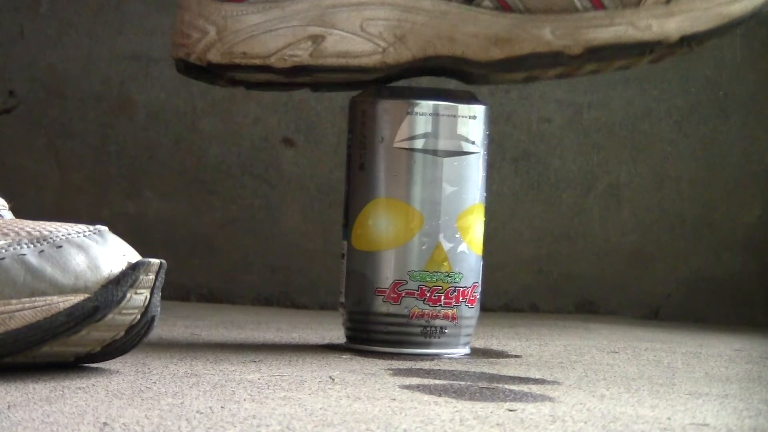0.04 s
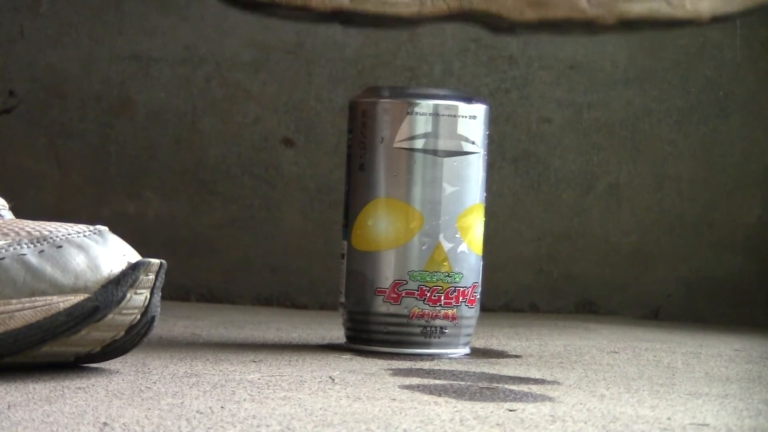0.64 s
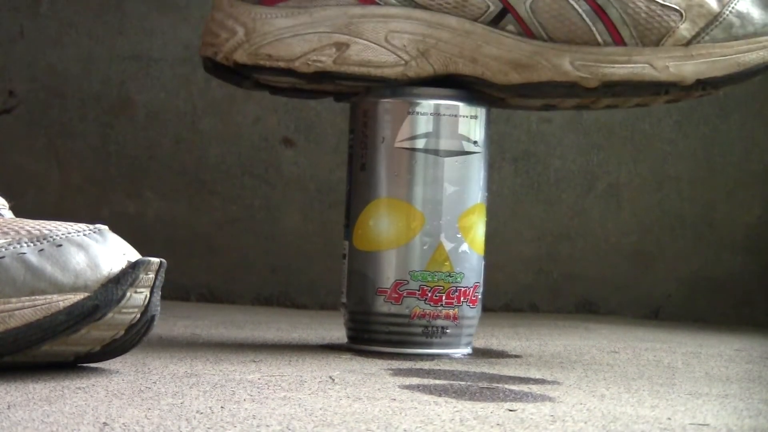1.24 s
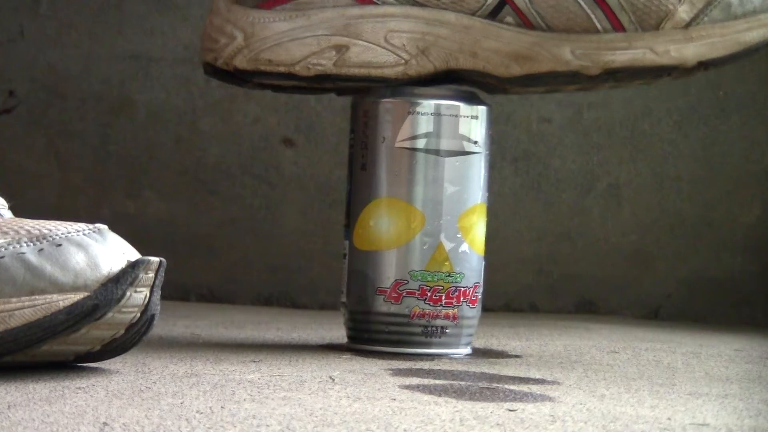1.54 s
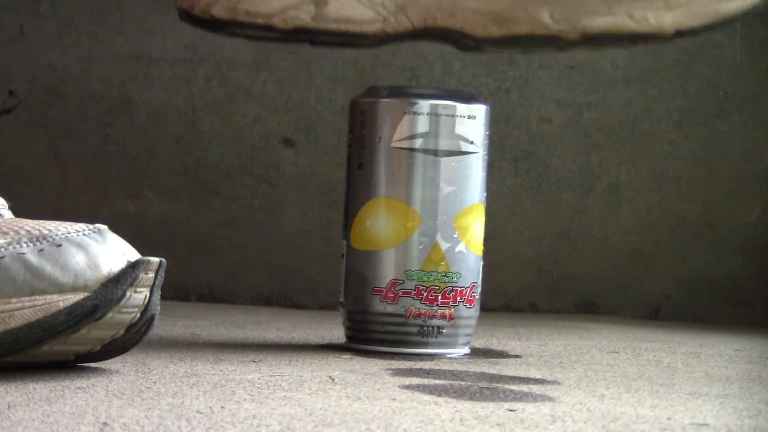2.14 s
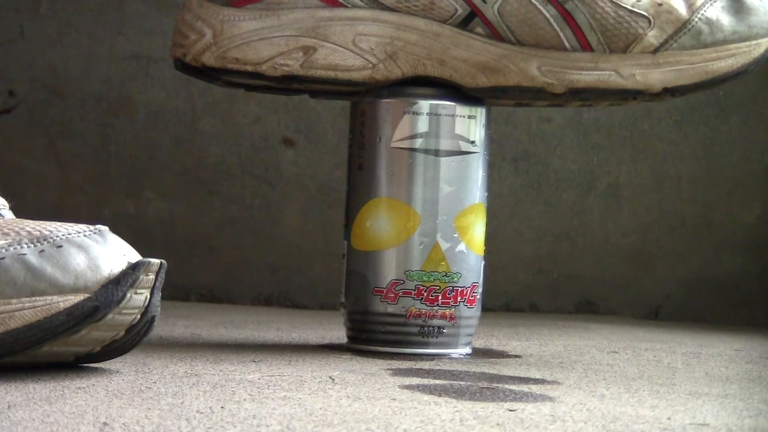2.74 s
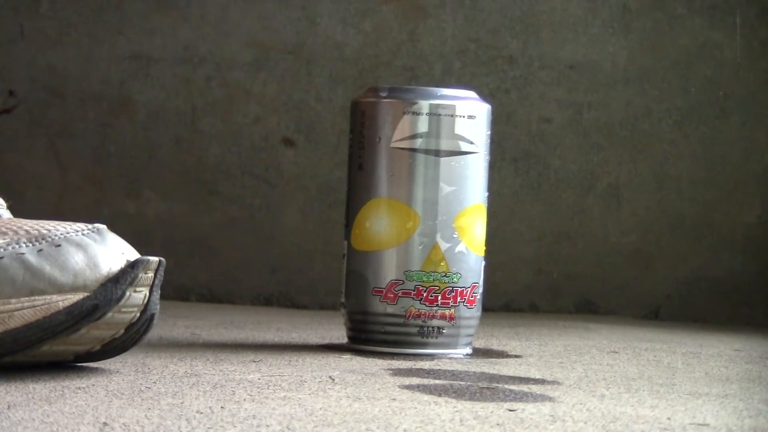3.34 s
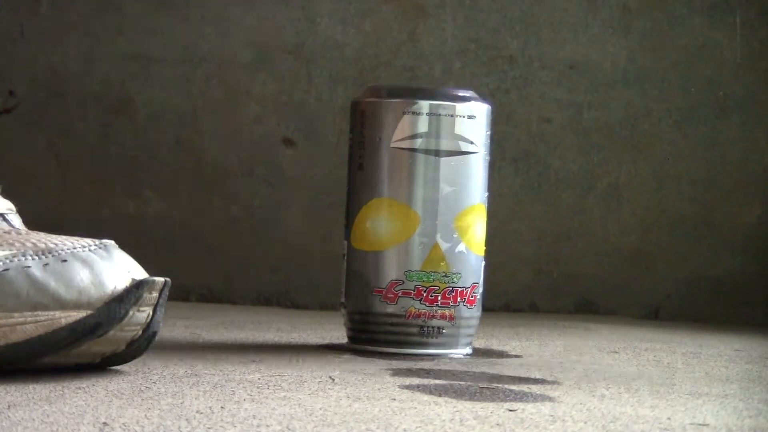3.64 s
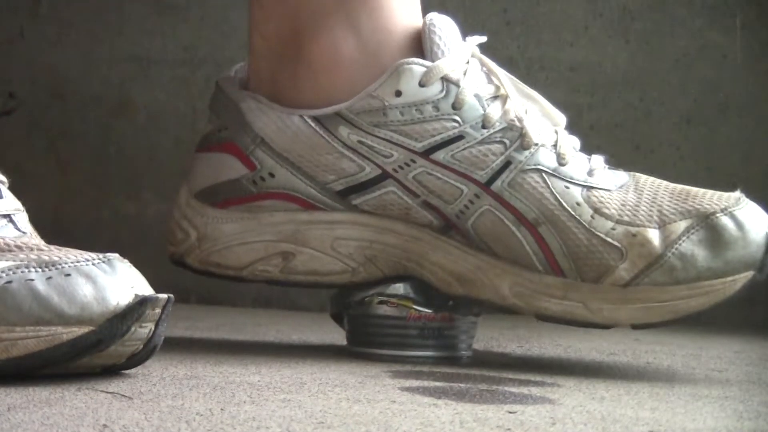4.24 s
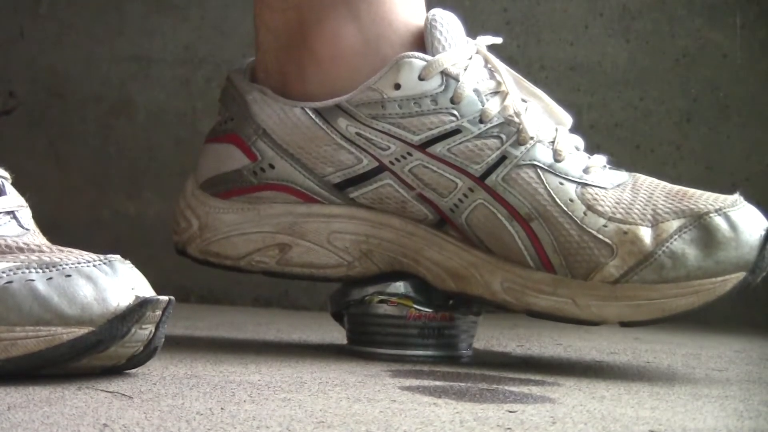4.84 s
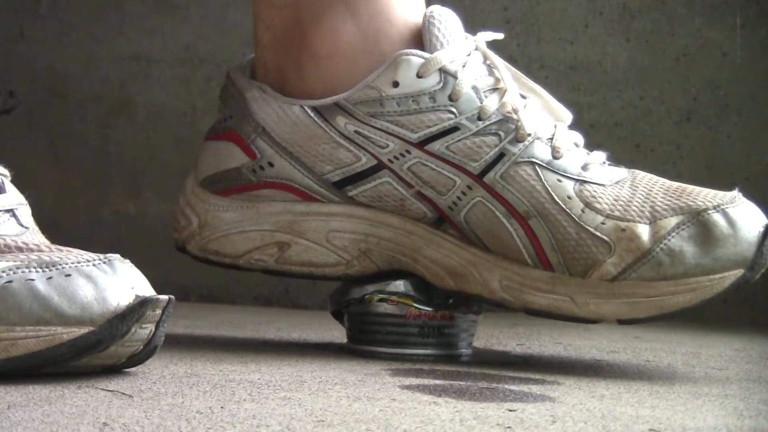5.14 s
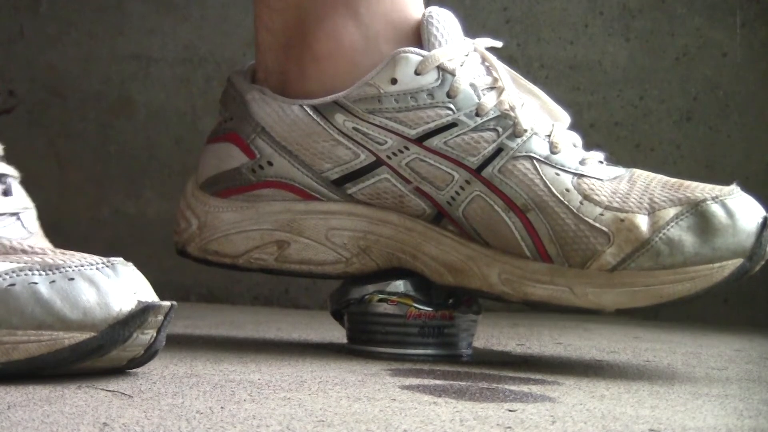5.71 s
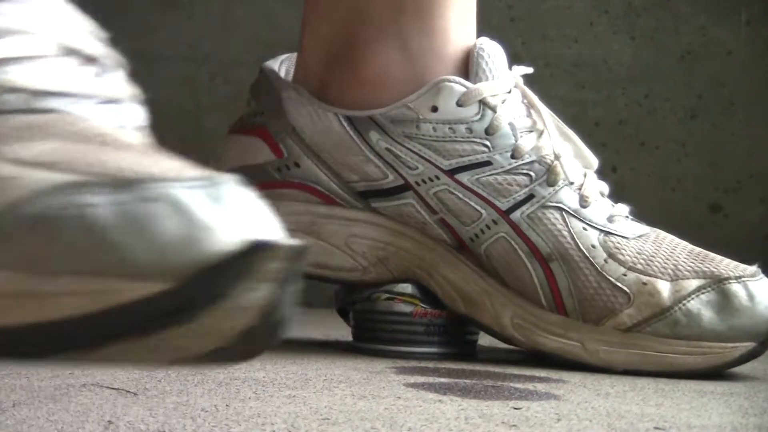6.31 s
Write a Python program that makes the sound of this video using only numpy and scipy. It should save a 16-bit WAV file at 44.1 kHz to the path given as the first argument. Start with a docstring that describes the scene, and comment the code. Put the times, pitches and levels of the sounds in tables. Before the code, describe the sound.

A shoe lightly taps an empty aluminium can on a concrete floor, making it rattle on its rim, ring briefly and give a faint hollow hoot. After a short pause, the foot stamps it flat with one very loud, sharp crunch that overloads the close microphone. Soft thuds, scuffs and cracking sand follow as the shoes settle. Bare walls add a short echo, over a low hum and faint motor ticking.

```python
"""An empty aluminium can is stamped flat on a concrete floor: its wall snaps into folds and its lid
slams onto its base. Before that, a shoe taps and rocks it, so the metal rings and the air inside hoots.
Afterwards the shoes settle and step, with soft thuds, scuffs and cracking sand. Bare walls ring briefly,
and the stamp overloads the microphone. A camera's lens motor ticks faintly over a low hum."""
import sys
import numpy as np
from scipy import signal
from scipy.fft import rfft, irfft
from scipy.io import wavfile
from scipy.ndimage import uniform_filter1d

SR = 44100
rng = np.random.default_rng(int(sys.argv[2]) if len(sys.argv) > 2 else 0)


def store_wav(level_fs):
    """Save 16-bit WAV to argv[1]."""
    pcm = np.round(np.clip(np.atleast_2d(level_fs), -1, 1) * 32767)
    wavfile.write(sys.argv[1], SR, pcm.T.astype(np.int16))


N = 289737
T = np.arange(int(.45 * SR)) / SR  # the time axis of one short sound, in seconds
STAMP_S, SLAM_S = 3.7154, 3.7197  # the wall starts to fold, then the lid hits the base

# The collapsing can, damped by the sole. Each row: pitch in Hz, relative level in dB, seconds to fade 60 dB.
CRUSHED_TONES = [(280, -8, 0.064), (329.6, -13, 0.18), (556, 1, 0.057), (656, -6.5, 0.058),
                 (813, -9.5, 0.048), (780, -5, 0.035), (976.7, -4.5, 0.069), (1117, -14, 0.066),
                 (1472, -6, 0.019), (1860, -4, 0.0088), (2100, -5.5, 0.03), (2270, -4.5, 0.03),
                 (3090, -6.5, 0.029), (4700, -11.5, .008)]
# The crack of one fold. Each row: frequency in Hz, relative level in dB.
CRACK_SPECTRUM = [(30, -22), (90, -7), (260, -0.5), (400, -5.5), (700, 4), (2200, -0.5), (2700, -5),
                  (3300, -4), (4000, -10.5), (5000, -8.5), (6200, -17), (10000, -17.5), (12000, -29.5),
                  (16000, -54.5)]
# The stamp's weight lands on the floor. Each row: start in seconds, pitch in Hz, level in dB.
FLOOR_THUMPS = [(3.714, 100.7, -14), (3.7190, 225.1, -8)]
# The sole meets the lid. Each row: start in seconds, ring level in dB, rattle time in seconds,
# knock pitch in Hz, knock level in dB, level of the sole's thud in dB.
LID_TAPS = [(0.871, -43.5, 0.0067, 545, -38.5, -45), (0.892, -45, .014, 159.8, -40, -52),
            (0.990, -59.5, .004, 1340, -59, -59), (1.01, -46, .007, 1680, -53, -70),
            (1.019, -32.5, 0.0057, 900, -31, -39.5), (2.3316, -27, .006, 1580, -35.5, -41),
            (2.923, -49, 0.0054, 350, -51.5, -49), (2.981, -61, .003, 1200, -57.5, -54.5),
            (3.034, -47, .006, 740, -51.5, -55)]
# The can rocks as the sole leaves it. Each row: start in seconds, seconds between touches, ring level
# in dB, change per touch in dB, knock pitch in Hz, knock level in dB compared with the ring.
ROCKING_RUNS = [(0.001, 0.013, -36, -1.34, 970, -8), (1.658, 0.0099, -44, -0.3, 587, -4),
                (1.769, .0215, -55.5, -1.95, 650, 0.5)]
# The ring of the uncrushed can. Each row: pitch in Hz, relative level in dB, seconds to fade 60 dB.
CAN_TONES = [(460, -32.5, 0.64), (563, -12, 0.18), (880, -6, 0.053), (946, -4, 0.026), (1123, -5, 0.04),
             (1330, -9.5, 0.17), (1403, -6.5, 0.069), (1660, -4, 0.14), (1707, -2.5, 0.11),
             (1788, 0.5, 0.095), (2050, -2, 0.12), (2110, -5.5, 0.058), (2510, -8, 0.058),
             (2947, -0.5, 0.056), (3137, 2, 0.022), (3346, 9.5, 0.029), (3430, 0, 0.0067),
             (5240, -17, 0.042), (7800, -34, 0.022), (8100, -13, 0.0075), (8400, -34, 0.071),
             (9600, -27, 0.0076)]
# The tick of the rim on concrete. Each row: frequency in Hz, relative level in dB.
RIM_SPECTRUM = [(80, -6), (300, -1.5), (1000, 5.5), (2200, 7), (2700, -10), (3350, -4), (4100, -12.5),
                (6500, -24.5), (9500, -17), (11500, -35), (13500, -29)]
# The air in the can hoots. Each row: start in seconds, level in dB, seconds to fade 60 dB,
# pitch in Hz while the opening is half covered.
AIR_HOOTS = [(0.051, -53.5, 0.76, 441), (1.88, -54.5, 0.28, 338)]
# Shoes settle and step. Each row: start in seconds, thud level in dB, thud pitch in Hz, thud time
# in seconds, scuff level in dB, scuff time in seconds, delay of the scuff in seconds.
FOOTSTEPS = [(3.16, -52, 174, 0.14, -65, .2, 0.00043), (4.136, -50, 280, .006, -56.5, 0.029, .008),
             (4.273, -54, 258, 0.014, -64, 0.034, .003), (4.697, -41.5, 288, .013, -50.5, .028, .004),
             (5.846, -50.5, 190, .022, -46.5, 0.036, .001), (5.939, -56.5, 378, 0.0053, -57.5, .01, 0),
             (6.401, -52, 230, 0.0087, -63, 0.018, 0.0024), (6.506, -48.5, 183, 0.013, -43, 0.022, 0)]
# Rubber scuffing the floor. Each row: frequency in Hz, relative level in dB.
SCUFF_SPECTRUM = [(100, -9), (500, 2.5), (1100, 1), (2200, -6), (3500, -14.5), (6000, -34.5), (10000, -34),
                  (13000, -48)]
# Sand cracks under the soles. Each row: start in seconds, level in dB, crackle time in seconds.
SAND_CRACKS = [(3.575, -62.5, 0.029), (5.476, -71, .0012), (5.8382, -46, .004), (5.898, -60.5, 0.039),
               (5.983, -72.5, .002)]
# One cracking grain. Each row: frequency in Hz, relative level in dB.
SAND_SPECTRUM = [(300, -12.5), (1200, 3), (2400, 2.5), (4500, -6), (7000, -13), (10500, -11), (12500, -30),
                 (16000, -46)]
# The rustle of the swinging leg. Each row: frequency in Hz, relative level in dB.
SWISH_SPECTRUM = [(200, -9.5), (1000, 4), (3500, 1.5), (6000, -8.0), (10000, -11), (13000, -29.5)]
# The tones of the lens motor. Each row: pitch in Hz, peak level in dB.
MOTOR_TONES = [(1790, -61), (2210, -73), (2750, -77)]
# Steady air noise. Each row: frequency in Hz, relative level in dB.
AIR_SPECTRUM = [(20, -8), (42, 0.5), (62, -5.5), (110, -3), (200, -1.5), (410, -7.5), (780, -10.5),
                (1400, -16.5), (1800, -13.5), (2500, -22.5), (3400, -25.5), (14700, -44), (16000, -48)]
# The air noise's stereo width. Each row: frequency in Hz, side level in dB compared with the middle.
AIR_WIDTH = [(30, -4.5), (150, 4), (1500, 0.0), (8000, -4)]
# A machine's hum. Each row: pitch in Hz, level in dB.
HUM_TONES = [(49, -74), (101, -76.5), (204, -79), (301, -92), (560, -83), (807, -86.5)]
# Echoes from nearby walls. Each row: delay in seconds, level in dB compared with the direct sound.
WALL_ECHOES = [(.0028, -21), (0.0133, -16), (0.0211, -14.5), (0.0316, -19)]
# The room's lingering sound. Each row: frequency in Hz, relative level in dB, seconds to fade 60 dB.
ROOM_BANDS = [(59.77, -7.5, 0.57), (130.4, -7, 0.41), (280, -6.5, 0.29), (600, -0.5, 0.29), (1150, 1, .33),
              (1990, -2, 0.32), (3400, -6, 0.31), (9000, -5.5, 0.28), (15000, -7.5, .18)]
# How unlike the two microphone openings sound. Each row: frequency in Hz, side level in dB
# compared with the middle.
STEREO_WIDTH = [(30, -7.5), (80, -10), (250, -17), (2000, -18), (4000, -16.5), (8000, -12), (13000, -6.5)]


def stamp(folds=9, first_gap_s=.0017, gap_growth=1.33, fall_db_per_s=220):
    """The can's wall buckles ever more slowly as the foot is braked; the lid slams and the floor thumps."""
    out, start, gap = np.zeros(N), STAMP_S, first_gap_s
    for _ in range(folds):
        age = start - STAMP_S
        weight = 1 - .35 * np.exp(-age / .0018)  # the foot's weight builds up
        # the folds are brightest while the metal is packed hardest
        bright_hz = 1900 + 13000 * np.exp(-((start - 3.7225) / .003) ** 2)
        snap = fold(-1 - fall_db_per_s * age, bright_hz, crinkle_s=.0014 + .39 * gap)
        add(out, start, weight * snap)
        start += gap
        gap *= gap_growth
    add(out, SLAM_S, fold(db=6, bright_hz=8963, crinkle_s=.00091))
    for start, hz, db in FLOOR_THUMPS:
        add(out, start, level(knock(hz, cycles=.97), db))
    # the stamp's deepest bass, below 80 Hz, is cut away
    return signal.lfilter(*signal.butter(2, 80, "high", fs=SR), out)


def fold(db, bright_hz, crinkle_s):
    """One snap of the wall crinkles the metal around it and rings the collapsing can."""
    shell = level(ring(CRUSHED_TONES, scatter_db=-1.0, detune=.019), -1.5)
    creases = chatter(crinkle_s, per_second=8870, swarm_db=4)
    crinkle = level(through(creases, click(CRACK_SPECTRUM)), 0)
    soften = signal.butter(1, min(bright_hz, SR / 2.2), fs=SR)
    return level(signal.lfilter(*soften, shell + crinkle), db)


def taps():
    """The sole taps the lid, and the can rocks on its rim in three short runs."""
    out, thud = np.zeros(N), knock(hz=296, cycles=.49)
    for start, ring_db, rattle_s, knock_hz, knock_db, thud_db in LID_TAPS:
        add(out, start - .0017, level(thud, thud_db))  # the rubber thuds just before the metal answers
        add(out, start, can_touch(ring_db, rattle_s, knock_hz, knock_db))
    for run in ROCKING_RUNS:
        add_rocking(out, *run)
    # the taps' highest treble is cut away above about 11 kHz
    return signal.sosfilt(signal.butter(8, 11300, fs=SR, output="sos"), out)


def can_touch(ring_db, rattle_s, knock_hz, knock_db):
    """One touch on the can: the lid knocks, the rim rattles on the floor and the wall rings."""
    wall = level(ring(CAN_TONES, scatter_db=.4, detune=.0077), 0)
    rim = level(click(RIM_SPECTRUM), 6.5 + .16 * ring_db)  # harder blows drive the rim into the floor
    bounces = chatter(rattle_s, per_second=3500, swarm_db=8.5)
    rattle = level(through(bounces, wall + rim), ring_db)
    lid = level(knock(knock_hz, cycles=.49 + knock_hz / 3500), knock_db)
    return rattle + lid


def add_rocking(out, start, gap_s, first_db, change_db, knock_hz, knock_offset_db):
    """The can rocks on its rim: five evenly spaced, fading touches, each with a dull rub."""
    rattle_s, spread_octaves = .014, .13
    for k, chance in enumerate(rng.standard_normal(5)):
        ring_db = first_db + k * change_db
        hz = knock_hz * 2 ** (spread_octaves * chance)
        rub = through(chatter(rattle_s, per_second=1800, swarm_db=6.5), knock(hz=231, cycles=.4))
        touch = can_touch(ring_db, rattle_s, hz, ring_db + knock_offset_db)
        add(out, start + k * gap_s, touch + level(rub, ring_db - 11))


def hoots(open_hz=454, uncover_s=.045):
    """The hollow note of the air in the can rises as the sole uncovers the opening."""
    out = np.zeros(N)
    for start, db, fade_s, covered_hz in AIR_HOOTS:
        hz = open_hz + (covered_hz - open_hz) * np.exp(-T / uncover_s)
        # air squeezing past the rubber makes the note waver until the hole is clear
        waver = uniform_filter1d(rng.standard_normal(len(T)), size=256)
        hz = hz + .8 * (open_hz - hz) * waver / np.std(waver)
        swell = (1 - np.exp(-T / .014)) * fade(fade_s)
        note = np.sin(2 * np.pi * np.cumsum(hz) / SR)
        add(out, start, level(swell * note, db))
    return out


def steps():
    """Soft soles thud and scuff; sand grains crack beneath them."""
    out, scuff, sand = np.zeros(N), click(SCUFF_SPECTRUM), click(SAND_SPECTRUM)
    for start, thud_db, thud_hz, thud_s, scuff_db, scuff_s, delay_s in FOOTSTEPS:
        landing = chatter(thud_s, per_second=3000, swarm_db=6.5)
        add(out, start, level(through(landing, knock(thud_hz, cycles=.43)), thud_db))
        rubbing = chatter(scuff_s, per_second=1600, swarm_db=18)
        add(out, start + delay_s, level(through(rubbing, scuff), scuff_db))
    for start, db, crackle_s in SAND_CRACKS:
        grains = chatter(crackle_s, per_second=2400, swarm_db=6.5)
        add(out, start, level(through(grains, sand), db))
    return out


def leg_swish(loudest_s=3.58, width_s=.17, db=-75):
    """The leg and shoe rustle softly on their way down, stopping at the stamp."""
    t = np.arange(N) / SR
    rustle = through(rng.standard_normal(N), click(SWISH_SPECTRUM))
    swell = np.exp(-.5 * ((t - loudest_s) / width_s) ** 2) * (t < STAMP_S)
    return rustle / np.std(rustle) * gain(db) * swell


def lens_motor(beats_per_s=59.94, offset_s=-.0163, peak_s=.006):
    """The focus motor nudges the lens, ticking on four of every nine beats of a fast, steady pulse."""
    out, t = np.zeros(N), T[:SR // 40]
    pulse = np.exp(-.5 * ((t - peak_s) / .0019) ** 2)
    tail = .053 * (t > peak_s) * np.exp(-(t - peak_s) / .0087)
    for beat in range(1, int(N / SR * beats_per_s)):
        if beat % 9 in (0, 2, 4, 6):
            strength, phase = rng.standard_normal(2)
            tones = sum(gain(db + 1.2 * strength) * np.sin(2 * np.pi * hz * t + np.pi * phase)
                        for hz, db in MOTOR_TONES)
            add(out, offset_s + beat / beats_per_s - peak_s, (pulse + tail) * tones)
    return out


def air_noise(middle_db=-69.5):
    """A soft, low rush of air, spread between left and right."""
    hz = np.fft.rfftfreq(N, 1 / SR)
    middle, side = rfft(rng.standard_normal((2, N))) * gain(lookup(hz, AIR_SPECTRUM))
    middle = irfft(middle, N)
    side = irfft(side * gain(lookup(hz, AIR_WIDTH)), N)
    return np.array([middle + side, middle - side]) * gain(middle_db) / np.std(middle)


def machine_hum():
    """A machine hums in a few low tones, each wavering slightly."""
    out, t = np.zeros(N), np.arange(N) / SR
    for hz, db in HUM_TONES:
        drift = np.cumsum(rng.standard_normal(N)) / np.sqrt(SR)
        out += np.sqrt(2) * gain(db) * np.sin(2 * np.pi * hz * t + .15 * np.sqrt(hz) * drift)
    return out


def room(source, tail_db, walls):
    """Add echoes and stereo width. Each wall gets its own version of the source to send back."""
    echoes = np.zeros(len(T))
    echoes[0] = 1  # the direct sound
    for delay_s, db in WALL_ECHOES:
        echoes[int(delay_s * SR)] += gain(db)
    tail = sum(through(source(), room_tail()) for _ in range(walls)) / np.sqrt(walls)
    middle = through(source(), echoes) + gain(tail_db) * tail
    smear = rng.standard_normal(len(T)) * fade(.08)
    side = through(middle, through(smear / np.linalg.norm(smear), click(STEREO_WIDTH)))
    return np.array([(middle + side) * gain(.17), (middle - side) * gain(-.17)])


def room_tail(build_s=.0074):
    """Countless echoes blur into noise that builds up, then dies at its own pace in each band."""
    hz, noise = np.fft.rfftfreq(len(T), 1 / SR), rfft(rng.standard_normal(len(T)))
    tail = 0
    for band_hz, db, fade_s in ROOM_BANDS:
        share = lookup(hz, [(row[0], row[0] == band_hz) for row in ROOM_BANDS])
        tail = tail + gain(db) * fade(fade_s) * irfft(noise * share, len(T))
    return tail * (1 - np.exp(-(T / build_s) ** 2)) / np.sqrt(SR * .03)


def ring(tones, scatter_db, detune):
    """Struck metal rings in fading tones; each blow lands elsewhere and mixes them a little differently."""
    out = np.zeros(len(T))
    for k, (hz, db, fade_s) in enumerate(tones):
        louder, higher = rng.standard_normal(2)
        tone = (-1) ** k * np.sin(2 * np.pi * hz * (1 + detune * higher) * T)
        out += gain(db + scatter_db * louder) * fade(fade_s) * tone
    return out


def chatter(length_s, per_second, swarm_db):
    """A first hit, then a dying swarm of random ones; swarm_db sets their combined strength."""
    hits = rng.standard_normal(len(T)) * (rng.random(len(T)) < per_second / SR)
    force = hits * np.exp(-T / length_s) * gain(swarm_db) / np.sqrt(per_second * length_s / 2)
    force[0] = 1
    return force


def knock(hz, cycles):
    """A blow damped by rubber: a wave that swells for this many cycles, then dies."""
    age = T * hz / cycles
    return age * np.exp(-age) * np.sin(2 * np.pi * hz * T)


def click(spectrum, size=4096):
    """The shortest click with this balance of low and high frequencies."""
    hz = np.fft.rfftfreq(size, 1 / SR)
    shape = irfft(np.log(gain(lookup(hz, spectrum))))
    # moving the second half onto the first packs the energy at the start (minimum phase)
    shape[1:size // 2] *= 2
    shape[size // 2 + 1:] = 0
    pulse = irfft(np.exp(rfft(shape)))
    return np.pad(pulse, (0, len(T) - size))


def gain(db):
    """Turn decibels into a number to multiply by."""
    return 10 ** (np.asarray(db) / 20)


def level(sound, db):
    """Give a short sound the energy of 10 milliseconds of steady sound at this level."""
    return sound * gain(db) / np.sqrt(np.sum(sound ** 2) / (SR / 100))


def fade(seconds):
    """A curve that falls by 60 dB in this time."""
    return np.exp(-np.log(1000) * T / seconds)


def add(out, start_s, sound):
    """Mix a sound into out at this time."""
    i = max(int(start_s * SR), 0)
    out[i:i + len(sound)] += sound[:N - i]


def through(sound, response):
    """Let every sample of the sound set off a copy of the response."""
    return signal.fftconvolve(sound, response)[:len(sound)]


def lookup(hz, table):
    """Read between a table's rows, with frequency spaced by octaves."""
    row_hz, values = np.transpose(table)
    return np.interp(np.log(hz + 1), np.log(row_hz), values)


def turn_down(sound, threshold_db, share, recovery_db_per_s):
    """The volume drops at once on a loud sound and comes back steadily, lifting the room's tail."""
    power = uniform_filter1d(np.mean(sound ** 2, axis=0), size=64)
    loudness_db = 10 * np.log10(np.abs(power) + 1e-18)
    cut_db = np.maximum(loudness_db - threshold_db, 0) * share
    recovery = recovery_db_per_s * np.arange(N) / SR
    return sound * gain(recovery - np.maximum.accumulate(cut_db + recovery))


def scene():
    """The can and shoes in the concrete room, over the steady background."""
    taps_and_steps = room(lambda: taps() + steps(), tail_db=-4, walls=2)
    crush = room(stamp, tail_db=-3.5, walls=3)
    return crush + taps_and_steps + hoots() + leg_swish() + lens_motor() + air_noise() + machine_hum()


def record(dry, top_hz=15800):
    """The volume dips on the stamp, which still overloads; the highest treble is cut away."""
    lowered = turn_down(dry, threshold_db=-12.5, share=.63, recovery_db_per_s=64.5)
    overloaded = np.clip(lowered, -1, 1)
    return signal.sosfilt(signal.ellip(8, .2, 70, top_hz, fs=SR, output="sos"), overloaded)


dry = scene()
out = record(dry)
store_wav(out)
```